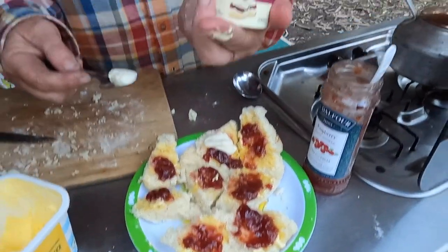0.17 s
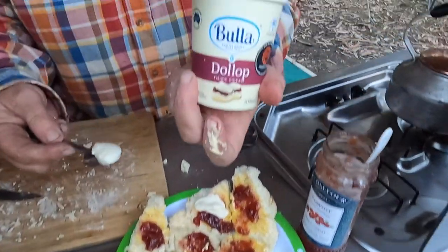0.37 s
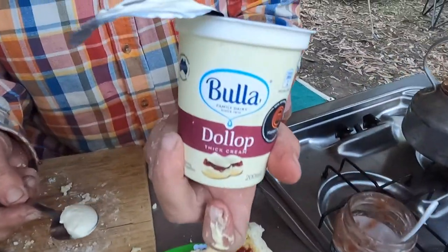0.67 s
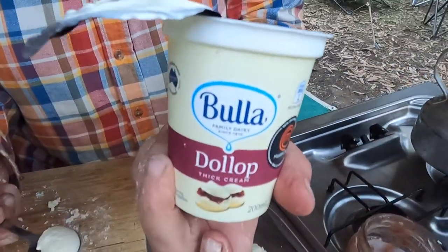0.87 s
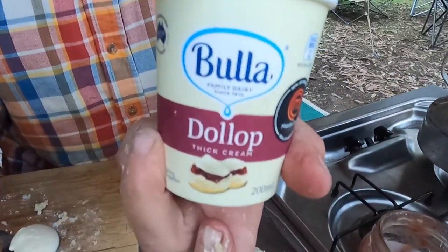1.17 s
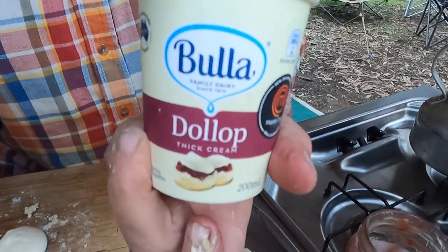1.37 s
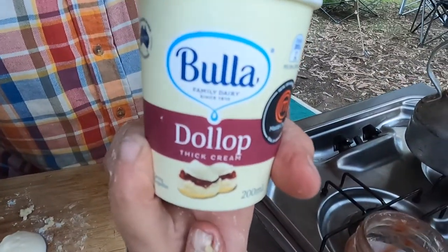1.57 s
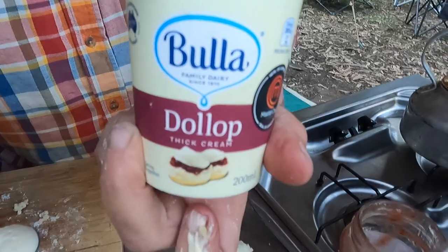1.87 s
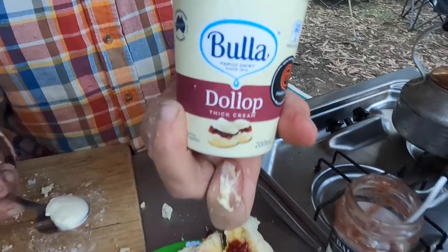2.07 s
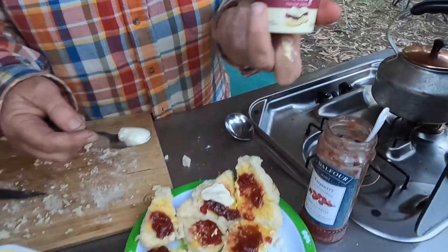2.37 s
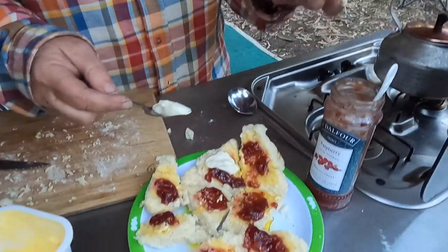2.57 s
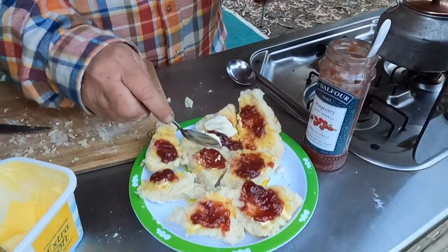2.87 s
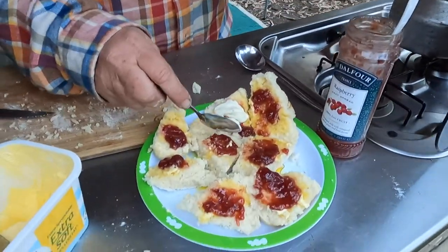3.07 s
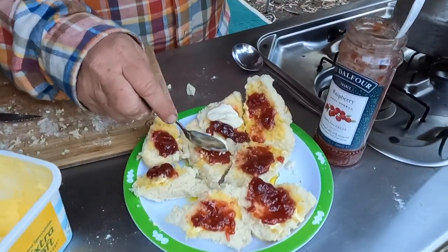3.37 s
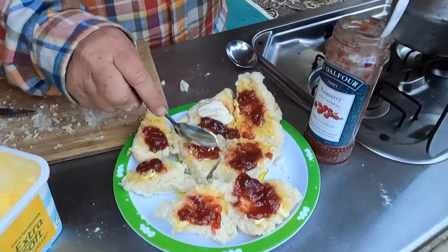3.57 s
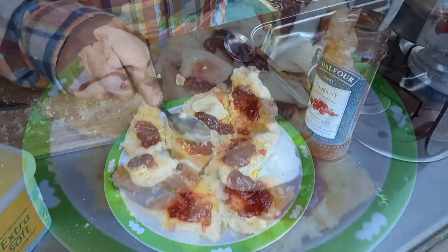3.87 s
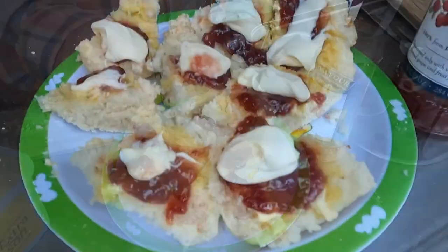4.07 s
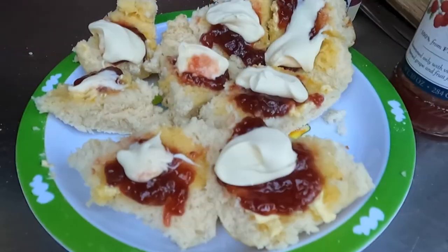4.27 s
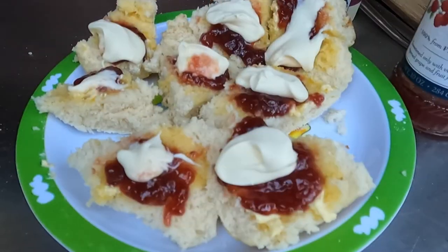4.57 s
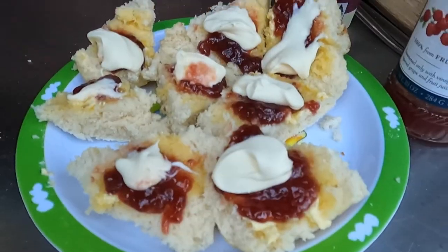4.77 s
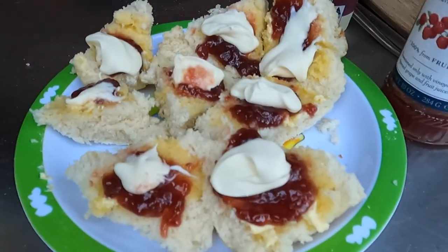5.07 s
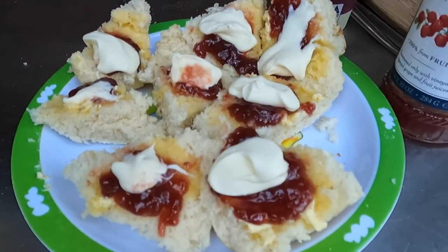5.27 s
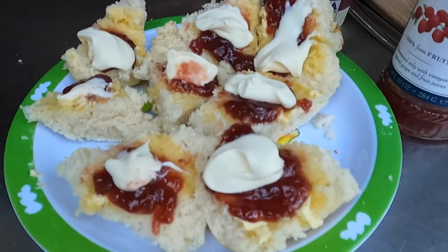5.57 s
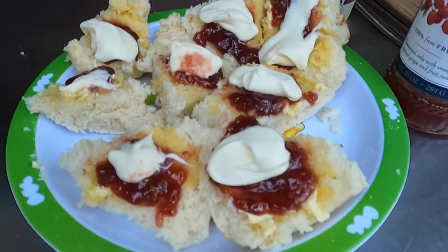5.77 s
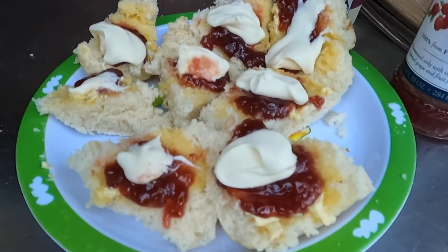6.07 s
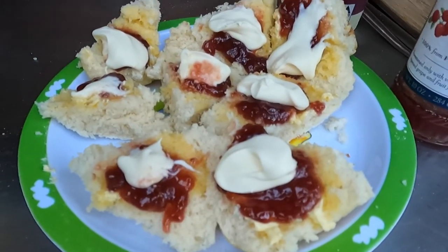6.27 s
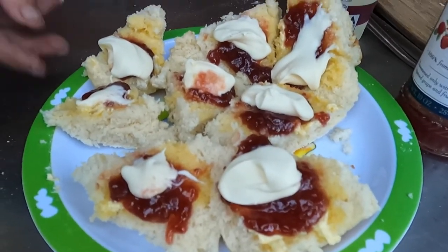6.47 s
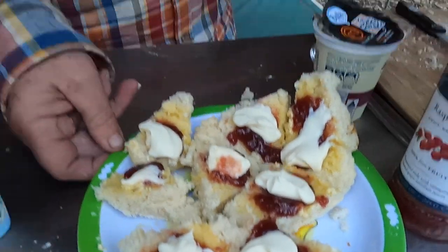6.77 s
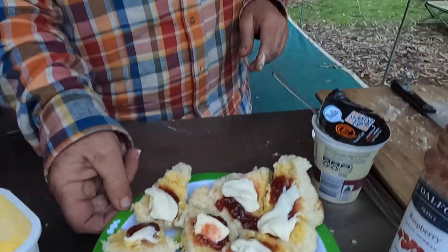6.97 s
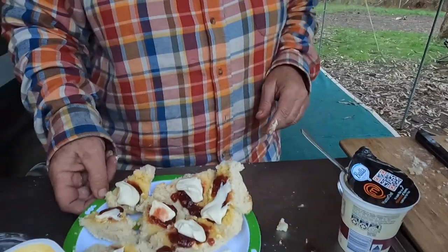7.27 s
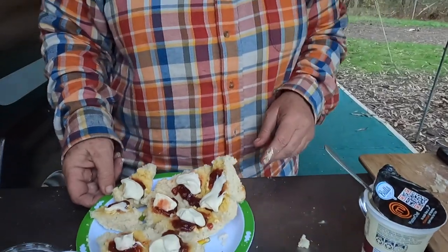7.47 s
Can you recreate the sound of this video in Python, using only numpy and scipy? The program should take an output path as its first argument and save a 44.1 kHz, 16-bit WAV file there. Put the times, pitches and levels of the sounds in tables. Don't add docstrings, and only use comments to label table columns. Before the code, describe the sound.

A small handheld camera outdoors, nearly mono and dry. From 0 to 3 s there is soft, smooth wind hiss in trees, with tiny high bird whistles around 0.7-1.5 and 2.4-2.9 s. Faint dry ticks, a weak thud and light touches appear from 3 to 4 s. At 4.2 s a spoon knocks a plastic tub: quick hollow double knocks, strong again around 4.5-4.6 s, mixed with short scuffs and low steel-table booms, ending with a weak boomy knock at 4.8 s. Hiss and small falling chirps fill 5.4-5.75 s. At 5.8 s the spoon lands with a bright, short metallic clack and two shrinking bounces. Dull table thuds come at 6.0 and 6.7 s, then faint airy rim brushes. At 7.0 s a plate skids hard and stops briefly, then drags grittily with squeaks and sharp jolts, strongest near 7.1-7.3 s, easing to 7.6 s.

```python
import sys
import numpy as np
from scipy import signal
from scipy.fft import rfft, irfft
from scipy.io import wavfile
from scipy.ndimage import uniform_filter1d

SR = 44100
rng = np.random.default_rng(int(sys.argv[2]) if len(sys.argv) > 2 else 0)


def wrap_up_sound(samples):
    columns = np.atleast_2d(samples).T
    tamed = np.clip(columns, -1, 1)
    steps = np.round(tamed * 32767).astype(np.int16)
    wavfile.write(sys.argv[1], SR, steps)


def makeup_ratio(level_db):
    decades = np.asarray(level_db, float) / 20
    return 10 ** decades


N = 336924

# start_s, body_db, table_boom_db and crack_db (both relative to body), loudest_hz
KNOCKS = [
    (4.2194, -15, -4.5, -30, 1260),
    (4.2468, -10, -3, -14, 2000),
    (4.2542, -12, -10, -6, 1250),
    (4.4865, -10, -15, -7, 1310),
    (4.5536, -14.5, -6, -15, 1290),
    (4.5707, -12.5, -6.5, -16, 1280),
    (4.8246, -19.5, 4, -23, 1270),
]
RAPS = [(3.9, -38, -5, -28, 2000), (3.655, -42, -10, -30, 1830), (3.703, -39, -9, -28, 1100),
        (4.3, -39, -16, 6, 2200), (3.953, -40, -14, -2, 2000), (4.566, -7.5, -12.5, -13, 2100),
        (4.2203, -22, -15, -22, 2700), (4.485, -22, -21, -4, 3290), (4.8225, -32, -3, -18, 1900),
        (4.515, -25, -10, -7, 2400)]
THUDS = [(3.112, -34, -20, -22, 870), (3.397, -45, -22, -20, 380), (3.932, -27.5, -35, -9.5, 270),
         (4.322, -26, -1, -23, 544), (4.64, -16.5, -10.5, -31, 350), (5.994, -27.5, -16, -21, 156),
         (6.034, -15, -11.5, -38, 440), (6.673, -25, -11.5, -22, 370), (6.686, -23.5, -19, -27, 98),
         (6.872, -37, -12, -16, 210), (4.825, -19, -18, -30, 430), (5.81, -16.5, -5, -30, 430),
         (5.853, -22, -14, -30, 420), (4.257, -18, -14, -30, 660), (4.236, -21, -5, -30, 460)]
SCUFFS = [(4.304, -19.5, -6, -11.5, 1860), (4.351, -36, 10, -18, 2250), (4.3943, -24, -7, -10.5, 3290),
          (4.51, -15.5, -7.5, -9, 2200), (4.531, -19, -0.5, -8, 2280), (4.612, -23.5, -21, -10, 3290),
          (4.643, -40, -5, -2, 3290), (4.693, -23, -5.5, -6, 2590), (4.7368, -26.5, -7, -7, 3280),
          (4.76, -29, -7, -4.5, 3280), (4.871, -35, 2, -9, 2720), (4.902, -34.5, -6, -11, 2010),
          (6.0157, -32.5, -24, -14, 2300), (6.6941, -33, -2.5, -16, 2890)]
BOUNCES = [
    (5.8063, -9.5, -5.5, -13.5, 2100),
    (5.8498, -16.5, -5.5, -12, 2200),
    (5.8735, -23.5, -15, -17, 2200),
    (5.9125, -45, 3, -12, 1370),
]
JOLTS = [(6.9751, -27.5, -9, -15, 2200), (6.9903, -22, -24, -20, 2080), (6.9973, -18.5, -23, -15, 2480),
         (7.0254, -15.5, -33, -7, 2570), (7.041, -22, -27, -8, 1200), (7.051, -22, -27, -13, 2600),
         (7.121, -28, -29, -5, 3200), (7.577, -29.5, -31, -15, 2780), (7.0745, -23, -27, -9, 2720),
         (7.086, -16.5, -24, -0.5, 3150), (7.0966, -20.5, -38, 1, 3000), (7.19, -15, -31, -1.5, 1300),
         (7.266, -23, -20, -8, 2000), (7.2691, -14, -21, -3.5, 2300), (7.3014, -12.5, -30, -7, 1920),
         (7.317, -16.5, -27, -22, 3190), (7.512, -29.5, -25, -6, 1900), (7.554, -30, -16, -16, 2740),
         (7.594, -25, -28, -9, 2030)]
# start_s, length_s, pitch_hz, level_db
BRUSHES = [
    (6.76, 0.049, 3630, -44.5),
    (6.81, 0.069, 3600, -45.5),
    (6.893, 0.059, 3680, -51),
]

# pitch_hz, level_db, t60_s (time to fade by 60 dB)
TUB = [(1106, -19, 0.2), (1290, -0.5, 0.03), (1590, -8, 0.047), (2010, -3, 0.021), (2192, -11, 0.062),
       (2400, -12, 0.029), (2670, -6, 0.04), (2800, -10.5, 0.033), (3290, -10, 0.054)]
SPOON = [(868, 5.5, 0.15), (1080, -6.5, 0.059), (1417, -2, 0.068), (2030, 4.5, 0.05), (2166, 7, 0.069),
         (2400, -22, 0.053), (3146, 3.5, 0.037), (3230, 1, 0.041)]
SPOON_TOP = [(3970, -2.5, 0.054), (4450, -11, .03), (5100, 1.5, 0.036), (5880, -7, 0.023),
             (7200, -2, 0.018), (8500, -3, 0.013), (10700, 3, 0.012)]
TABLE = [(143.8, -5.5, 0.27), (172, -6, 0.32), (241, -8.5, 0.15), (290.5, -7, 0.13), (349, -5, 0.12),
         (413.4, 2, 0.053), (495, -3.5, 0.11), (591.6, -2.5, 0.059), (665, -11, 0.022), (842, -10, 0.11)]
LEGS = [(109, 11.5, 0.21)]
# pitch_hz, level_db (per Hz)
CRACK = [(1900, -29), (3300, 7), (4000, 4.5), (5400, -4), (7500, -10.5), (9000, -18.5), (11000, -14.5),
         (14500, -26)]

# start_s, length_s, plate_db, table_rumble_db and squeak_db (relative to plate)
RUBS = [(3.35, 0.11, -50, 6, 3), (3.907, 0.082, -48, -7, 2), (4.246, 0.05, -16, -9, -7),
        (4.285, 0.077, -34, 7, -16), (4.432, 0.11, -37, 0, -3), (4.483, 0.1, -27.5, -1, -3),
        (4.519, 0.037, -32, 1, -6), (4.558, .16, -43.5, 16, -6), (4.731, 0.28, -44.5, 2, -16),
        (5.8, 0.23, -47, 12, -15), (6.014, 0.22, -47.5, 6.5, -15), (6.668, 0.095, -39.5, -20, 1),
        (6.789, 0.18, -46.5, -8, 3.5), (6.978, 0.037, -31, 5, -25), (7.219, 0.039, -32, -8, -8),
        (7.299, 0.12, -22, -3, 1), (7.55, 0.11, -22.5, -9, -16)]
# start_s, pressure_db, loudest_hz
SKID = [
    (6.974, -33, 2000),
    (6.99, -22, 2100),
    (7.0, -22, 2400),
    (7.012, -18.5, 3400),
    (7.027, -18.5, 2700),
    (7.045, -20.5, 2600),
    (7.053, -23, 2600),
    (7.06, -35, 2600),
]
# start_s, pressure_db, loudest_hz
DRAG = [(6.972, -41, 2000), (7.0, -28, 2490), (7.065, -26.5, 3000), (7.11, -26, 3000), (7.15, -24, 3600),
        (7.2, -25, 2980), (7.25, -24, 3050), (7.3, -21, 3000), (7.34, -27.5, 2000), (7.38, -27, 3050),
        (7.43, -29.5, 2520), (7.5, -30, 3200), (7.53, -30, 3530), (7.55, -32.5, 2800), (7.61, -30, 2500),
        (7.64, -40, 2500)]
# pitch_hz, width_hz, level_db
PLATE = [(920, 810, -12.5), (1260, 430, 1), (1972, 226, 4), (2200, 250, -1), (2576, 310, 1.5),
         (2930, 290, 0.5), (3223, 200, 0)]
SKID_MODES = [(680, 26, -7), (1190, 50, 0), (2040, 40, -2), (2600, 130, 3.5), (2730, 36, 0), (3290, 34, -9),
              (3660, 26, -3), (3920, 72, -2.5), (4130, 65, -9), (4400, 43, -16), (5330, 27, -23),
              (6900, 61, -11)]
SQUEAK = [(3610, 140, 0), (3830, 230, 2), (4270, 150, 0), (4620, 154, 3), (5430, 120, -1), (5755, 130, 3),
          (6980, 490, 3), (10800, 5000, -4.5)]

# start_s, length_s, first_hz, lowest_hz, level_db
CHIRPS = [
    (5.42, 0.051, 4500, 3140, -61.5),
    (5.499, 0.035, 3000, 2730, -59.5),
    (5.599, .03, 4270, 3400, -65),
    (5.723, 0.013, 3150, 2720, -60),
]
# multiple, level_db
OVERTONES = [(2, 4), (3, -8), (4, -14)]
# start_s, length_s, first_hz, last_hz, level_db
WHISTLES = [(.74, 0.04, 8500, 7200, -59), (.9, .07, 7200, 8050, -63), (1.078, .035, 7300, 7850, -61),
            (1.178, .03, 6900, 7900, -60), (1.322, 0.0076, 9300, 5700, -56),
            (1.327, 0.0074, 5800, 5800, -54), (1.328, .011, 5700, 8040, -50.5),
            (1.34, .011, 7950, 6300, -58), (1.484, 0.096, 7300, 7450, -56), (2.44, 0.053, 8600, 7000, -59),
            (2.603, 0.062, 8000, 6300, -61.5), (2.797, 0.065, 8300, 6000, -66)]
# start_s, level_db
TICKS = [(0.3835, -61), (2.8659, -66), (3.3664, -60), (3.4121, -54), (3.5882, -64), (3.6396, -66),
         (3.911, -68), (3.9524, -67), (4.2557, -47), (4.5011, -50), (4.565, -47), (4.645, -43.5),
         (5.807, -39), (6.69, -48)]
# start_s, hiss_db
WIND = [(0, -46), (.8, -45), (2.1, -46), (3.6, -45.5), (3.95, -48.5), (4.95, -49.5), (6.36, -49),
        (7.64, -44.5)]
# pitch_hz, level_db (per Hz)
TREES = [(24, -63), (40, -44), (102, -73), (148, -6.5), (267, -3), (377, -5), (533, -2), (665, -4.5),
         (1830, -6), (3390, -11), (7090, -27), (9080, -44), (11100, -39.5), (14500, -80)]
# peak_s, dying_time_s, level_db
GUSTS = [
    (.1, 0.94, -48.5),
    (4.9, 0.37, -53),
]
RUSTLES = [
    (.2, 0.55, -74),
    (1.3, .8, -90),
    (5.4, 0.98, -85),
]
BUFFET = [(.25, .25, -65), (3.14, .1, -75), (3.64, 0.18, -82), (3.96, 0.092, -56), (4.27, 0.18, -45),
          (4.58, 0.21, -40), (4.86, 0.23, -49.5), (5.82, .3, -59), (6.04, .22, -48), (6.69, .25, -63),
          (6.89, .2, -58), (7.25, .4, -70)]
# pitch_hz, level_db
HOUSING = [(30, -33), (90, -20), (150, -2.5), (5000, 1.5), (7000, -8.5), (9000, -19), (11000, -11),
           (13000, -25), (14500, -27), (16500, -44)]
# pitch_hz, side_db (relative to middle)
PORTS = [(300, -45), (7000, -42), (9900, -30), (10500, -14), (11500, -7), (12300, -3), (14000, -2)]


def evened(x):
    return x / np.sqrt(np.mean(x ** 2) + 1e-20)


def add(mix, s, sound):
    part = mix[round(s * SR):][:len(sound)]
    part += sound[:len(part)]


def coloured(x, points):
    f, db = np.transpose(points)
    hz = np.fft.rfftfreq(len(x), 1 / SR)
    return irfft(rfft(x) * makeup_ratio(np.interp(np.log(hz + 1), np.log(f), db)), len(x))


def resonate(x, hz, width):
    pole = np.exp((2j * hz - width) * np.pi / SR)
    return 2 * signal.lfilter([1 - abs(pole)], [1, -pole], x).real


def humps(rows, floor_db, rise):
    t = np.arange(0, N, 64) / SR
    level = makeup_ratio(floor_db)
    for s, fade, db in rows:
        distance = np.maximum((t - s) / fade, (s - t) / (rise * fade))
        level = level + makeup_ratio(db - 40 * distance)
    return np.interp(np.arange(N) / SR, t, level)


def ring(modes, contact, stretch):
    longest_s = stretch * max(m[2] for m in modes)
    t = np.arange(min(9000, round(SR * longest_s) + len(contact))) / SR
    luck = rng.standard_normal((len(modes), 2)) * [1, 1 / 200]
    hz, db, t60 = np.transpose(modes)[:, :, None]
    hz = hz * (1 + luck[:, 1:])
    push = abs(np.exp(2j * np.pi * hz * t[:len(contact)]) @ contact) ** 2 / (contact ** 2).sum()
    tone = makeup_ratio(db + luck[:, :1] - 60 * t / (t60 * stretch)) * np.sin(2 * np.pi * hz * t)
    tone = (tone / np.sqrt(push[:, None] + .15)).sum(axis=0)
    out = signal.fftconvolve(tone, contact)[:len(t)]
    loudest = np.sqrt(uniform_filter1d(out ** 2, size=176).max())
    return np.pad(out, (0, 9000 - len(t))) / loudest


def murmur(modes, width, t, fade_s):
    f = np.fft.rfftfreq(len(t), 1 / SR)
    bands = np.sqrt(sum((makeup_ratio(db) / (1 + (2 * (f - hz) / width) ** 2)) ** 2 for hz, db, _ in modes))
    noise = irfft(rfft(rng.standard_normal(len(t))) * bands, len(t))
    return evened(noise) * np.exp(-t / fade_s)


def blow(row, share, body, top, touch, contact_s, crack_s, ring_db, snap_db):
    s, db, low_db, high_db, centre_hz = row
    stretch = 1.65 * max(share, .1)
    t = np.arange(9000) / SR
    contact = rng.standard_normal(1500) * np.exp(-t[:1500] / contact_s)
    contact = contact[:round(6 * contact_s * SR)]
    contact[0] += touch

    body = [(f, d - 8.0 * abs(np.log2(f / centre_hz)), t60) for f, d, t60 in body]
    sound = makeup_ratio(ring_db) * ring(body, contact, stretch)
    sound += 0.32 * murmur(body, 530, t, 0.015 * stretch)

    snap_modes = [(1300, 4.5, 0.0073), (2370, 6, 0.0059), (3450, -10.5, 0.011)]  # Hz, dB, t60 s
    snap = ring(snap_modes, np.diff(np.convolve(contact[:40], np.hanning(12))), 0.9)
    sound += makeup_ratio(snap_db - 15.0 * share) * snap

    blunt = np.convolve(contact, signal.windows.hann(40))
    boom = ring(TABLE, blunt, stretch) + makeup_ratio(-6.0) * murmur(TABLE, 90, t, 0.033 * stretch)

    crack = evened(coloured(rng.standard_normal(len(t)), CRACK)) * np.exp(-t / (crack_s * stretch))
    if top:
        crack = 2.8 * crack + ring(top, contact, stretch)

    rise = 1 - np.exp(-t / (0.43 * contact_s))
    rise *= np.minimum((len(t) - t * SR) / 2000, 1)
    sound = sound + makeup_ratio(low_db - 1.0) * boom + makeup_ratio(high_db + 0.5) * crack
    return s, makeup_ratio(db) * sound * rise


def blows():
    mix = np.zeros(N)
    plate = [(f, db, 10.0 / w) for f, w, db in PLATE]
    squeak = [(f, db, 2.0 / w) for f, w, db in SQUEAK]
    table = LEGS + TABLE + TUB[:2]
    # rows, ring share, body, top, first touch, contact s, crack s, ring dB, snap dB
    kinds = [(KNOCKS, 0.53, TUB, None, 6.2, 0.0014, 0.004, 0.76, 5.2),
             (RAPS, 0.32, TUB, None, 4.4, 0.00087, 0.003, 2.2, 3.8),
             (THUDS, 0.79, table, None, 2.18, 0.00062, 0.006, -2.0, -31),
             (SCUFFS, 0.56, TUB, None, 0, 0.0081, 0.0099, -6.5, -20),
             (BOUNCES, 0.6, SPOON, SPOON_TOP, 1.65, 0.0022, 0.0013, 0.89, -10),
             (JOLTS, 0.53, plate, squeak, 1.6, 0.0012, 0.0025, 0.36, -1.5)]
    for rows, *settings in kinds:
        for row in rows:
            add(mix, *blow(row, *settings))
    for s, length, hz, db in BRUSHES:
        noise = rng.standard_normal(round(length * SR))
        puff = resonate(resonate(noise, hz, 900), hz, 900)
        add(mix, s, makeup_ratio(db) * evened(puff) * signal.windows.tukey(len(puff), .6))
    return mix


def rocking(slips, modes, spot_hz):
    favour_db, wander_db = 4, 2.5
    slow = rng.standard_normal((len(modes), len(slips) // 64 + 30))
    slow = evened(uniform_filter1d(uniform_filter1d(slow, size=14), size=14))
    slow = np.repeat(slow, 64, axis=1)[:, :len(slips)]
    total = np.zeros(len(slips))
    for k, (f, w, db) in enumerate(modes):
        level_db = db + wander_db * slow[k] - favour_db * abs(np.log2(f / spot_hz))
        total += (-1) ** k * makeup_ratio(level_db) * resonate(slips, f, w)
    return evened(total)


def rub(s, level_db, spot_hz, body, rumble_db, squeak_db):
    t = np.arange(s[0], s[-1], 1 / SR)
    drag_db, spot_hz = np.interp(t, s, level_db), np.interp(t, s, spot_hz)
    slips = makeup_ratio(1.65 * np.minimum(rng.exponential(1, len(t)), 5))
    slips = slips * (rng.random(len(t)) < 5000 / SR)
    chatter = evened(uniform_filter1d(rng.standard_normal(len(t)), size=200))
    slips = slips * rng.choice([-1., 1.], len(t)) * makeup_ratio(0.8 * chatter)
    table = sum(makeup_ratio(db) * resonate(slips, f, 7.8 / t60) for f, db, t60 in TABLE)
    sound = rocking(slips, body, spot_hz)
    sound = sound + makeup_ratio(squeak_db) * rocking(slips, SQUEAK, spot_hz) + makeup_ratio(rumble_db) * evened(table)
    return s[0], makeup_ratio(drag_db - 3.5) * sound * signal.windows.tukey(len(t), 300 / len(t))


def rubs():
    mix = np.zeros(N)
    for s, length, db, rumble_db, squeak_db in RUBS:
        times = [s, s + 0.29 * length, s + length]
        add(mix, *rub(times, [db - 9, db, db - 17.5], [2800] * 3, PLATE, rumble_db, squeak_db))
    tipped = [(f, 1.8 * w, db + 3.6 * np.log2(f / 2000)) for f, w, db in SKID_MODES]
    add(mix, *rub(*np.transpose(SKID), tipped, rumble_db=-14, squeak_db=-14))
    add(mix, *rub(*np.transpose(DRAG), PLATE, rumble_db=-13, squeak_db=2))
    return mix


def note(s, hz, db, overtones, waver):
    t = np.arange(s[0], s[-1], 1 / SR)
    wobble = evened(uniform_filter1d(rng.standard_normal(len(t)), size=120))
    turns = np.cumsum(np.interp(t, s, hz) * (1 + waver * wobble)) / SR
    tone = sum(makeup_ratio(d) * np.sin(2 * np.pi * k * turns) for k, d in overtones)
    tone = tone * makeup_ratio(np.interp(t, s, db) + 3.0) * signal.windows.tukey(len(t), .3)
    echoes = rng.standard_normal(3000) * np.exp(-np.arange(3000) / 900) * makeup_ratio(-31.5)
    echoes[0] = 1
    return s[0], signal.fftconvolve(tone, echoes)


def birds():
    mix = np.zeros(N)
    for s, length, first_hz, low_hz, db in CHIRPS:
        times = [s, s + .009, s + length]
        hook_hz = [first_hz, low_hz, low_hz * 1.08]
        add(mix, *note(times, hook_hz, [db, db - 2, db - 4], OVERTONES, .012))
    share = np.array([0, 0.47, 1])
    for s, length, first_hz, last_hz, db in WHISTLES:
        glide_hz = first_hz + (last_hz - first_hz) * share
        add(mix, *note(s + length * share, glide_hz, [db - 7, db, db - 4], [(1, 0)], 0.017))
    return mix


def ticks():
    mix = np.zeros(N)
    t = np.arange(1500) / SR
    for s, db in TICKS:
        burst = resonate(resonate(rng.standard_normal(len(t)), 6600, 4500), 11000, 3000)
        add(mix, s, makeup_ratio(db) * evened(burst) * np.exp(-t / 0.0063) * np.minimum(t / .001, 1))
    return mix


def wind():
    frames = N // 256 + 5
    a, b, patches = rng.standard_normal((frames, 513, 3)).T
    patches = evened(uniform_filter1d(uniform_filter1d(patches, size=14, axis=0), size=12, axis=1))
    hiss = signal.istft((a + 1j * b) * makeup_ratio(1.3 * patches), nperseg=1024, noverlap=768)[1][:N]
    hiss_db = np.interp(np.arange(N) / SR, *np.transpose(WIND))
    gust = resonate(resonate(rng.standard_normal(N), 327, 160), 327, 160)
    rustle = resonate(resonate(rng.standard_normal(N), 10800, 3000), 10800, 3000)
    gust = humps(GUSTS, floor_db=-56.5, rise=1.0) * evened(gust)
    rustle = humps(RUSTLES, floor_db=-89.5, rise=0.98) * evened(rustle)
    return makeup_ratio(hiss_db + 1.0) * evened(coloured(hiss, TREES)) + gust + rustle


def buffet():
    lumps = coloured(rng.standard_normal(N), [(15, -12), (30, -7), (90, -3), (130, -3), (200, -75)])
    return humps(BUFFET, floor_db=-95, rise=.6) * makeup_ratio(5.5) * evened(lumps)


def causal(points):
    f, db = np.transpose(points)
    hz = abs(np.fft.fftfreq(4096, 1 / SR))
    log_gain = np.log(makeup_ratio(np.interp(np.log(hz + 1), np.log(f), db)))
    return np.fft.ifft(np.exp(np.conj(signal.hilbert(log_gain)))).real[:2048]


def scene():
    near = signal.oaconvolve(blows() + rubs(), causal(HOUSING))[:N]
    mix = near + birds() + ticks() + wind() + buffet()
    return np.array([mix, mix])


def low_pass(x):
    return signal.sosfilt(signal.butter(12, 16500, fs=SR, output="sos"), x)


def record(dry):
    x = signal.sosfilt(signal.butter(2, 110, "high", fs=SR, output="sos"), dry[0])
    x = signal.lfilter(*signal.iirnotch(9080, 22.0, SR), x)
    scatter = evened(coloured(rng.standard_normal(N), [(10, 0), (200, 0), (300, -120)]))
    side = coloured(x, PORTS) * scatter
    mix = np.clip(np.array([x + side, x - side]), -.96, .96)
    return low_pass(mix)


dry = scene()
out = record(dry)
wrap_up_sound(out)
```